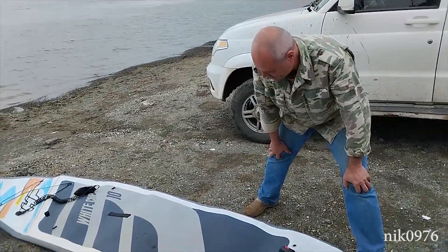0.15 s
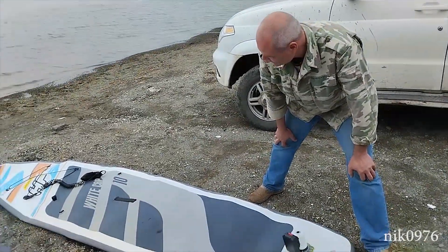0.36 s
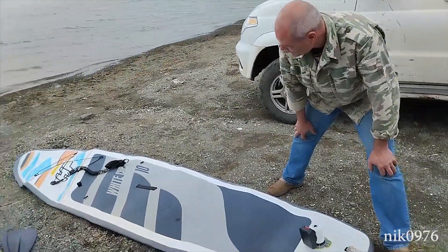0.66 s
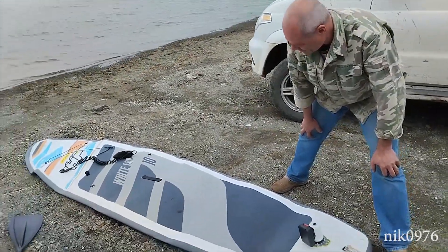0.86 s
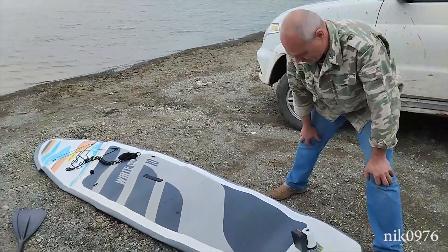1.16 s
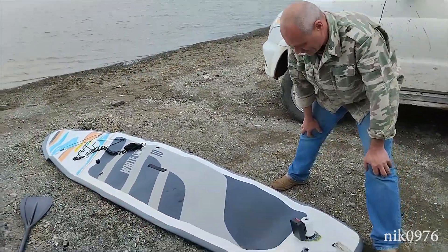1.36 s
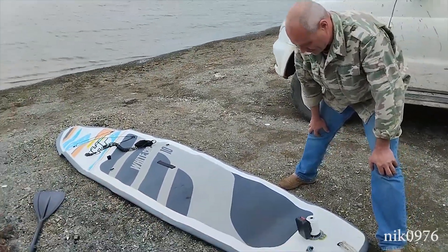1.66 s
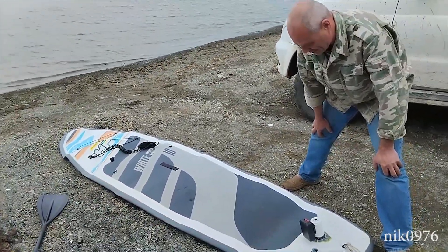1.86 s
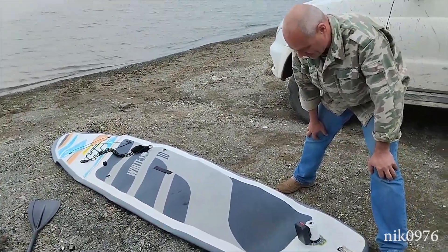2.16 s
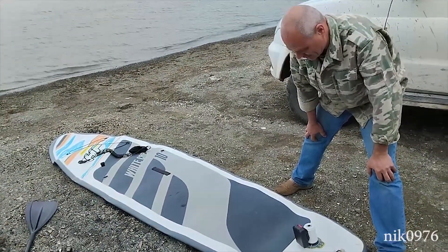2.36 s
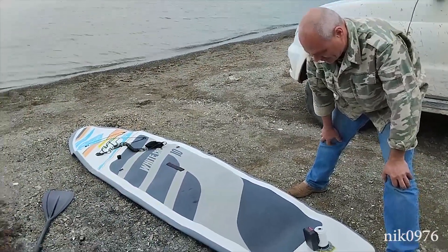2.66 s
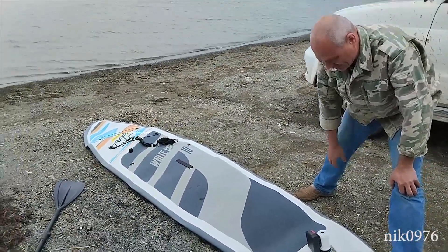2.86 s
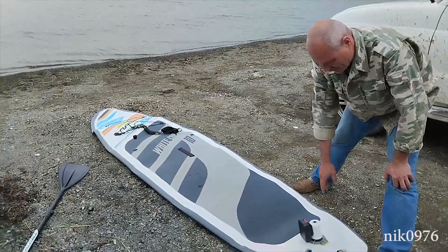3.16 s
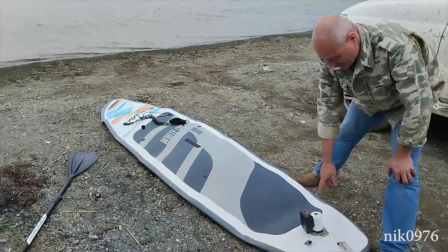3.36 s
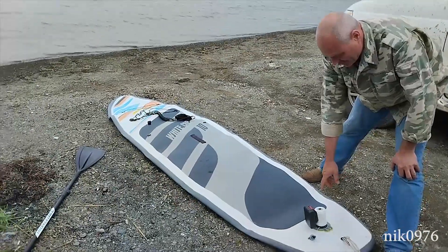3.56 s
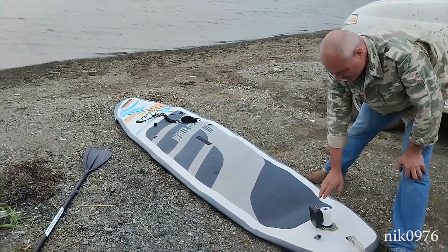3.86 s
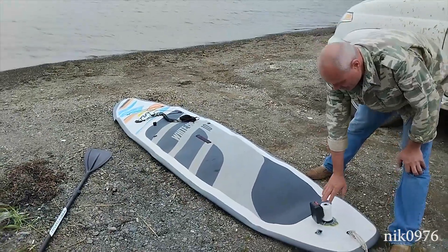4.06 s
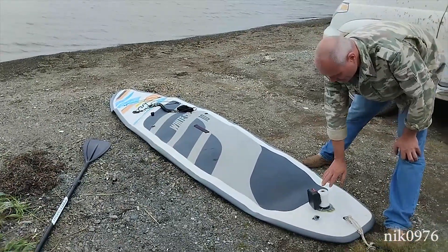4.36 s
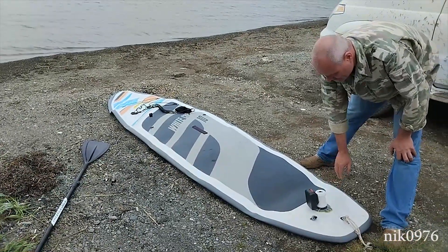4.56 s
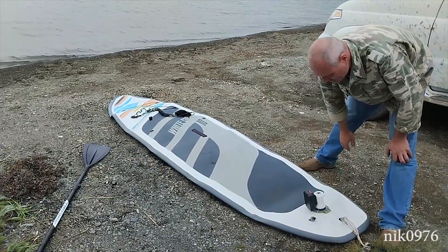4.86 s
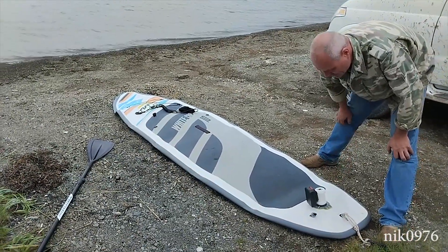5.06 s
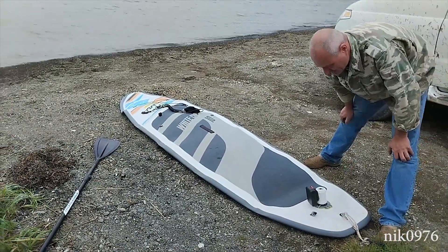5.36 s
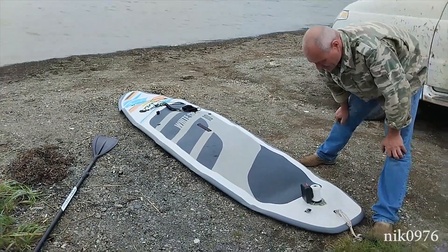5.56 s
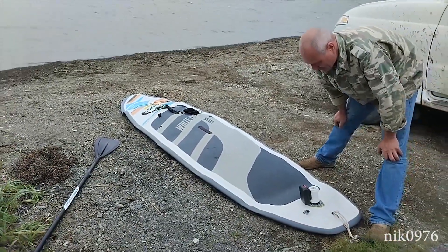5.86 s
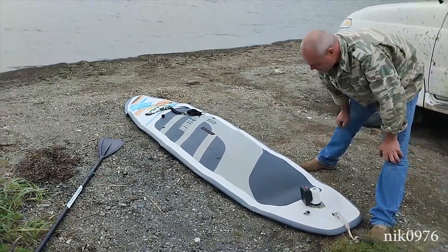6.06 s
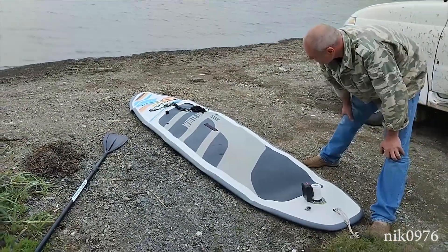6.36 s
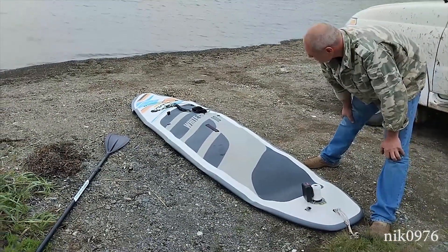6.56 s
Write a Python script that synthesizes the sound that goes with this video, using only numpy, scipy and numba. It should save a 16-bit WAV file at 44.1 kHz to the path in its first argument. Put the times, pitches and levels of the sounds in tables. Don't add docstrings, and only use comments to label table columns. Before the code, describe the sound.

A small electric inflator runs without pause on an inflating board, giving a thin piercing whine and bright rushing hiss. Irregular wind gusts thump the microphone, hardest around three seconds. A hand passing the blower throws a short puff of air at about four and a half seconds, with the whine briefly lifting. Faint water wash and a low hum lie behind, outdoors on gravel, from a few metres away.

```python
import sys
import numpy as np
from scipy import signal
from scipy.fft import rfft, irfft
from scipy.io import wavfile
from scipy.ndimage import uniform_filter1d, map_coordinates
from numba import njit

SR = 44100
rng = np.random.default_rng(int(sys.argv[2]) if len(sys.argv) > 2 else 0)


def wrap_up_sound(samples):
    columns = np.atleast_2d(samples).T
    tamed = np.clip(columns, -1, 1)
    steps = np.round(tamed * 32767).astype(np.int16)
    wavfile.write(sys.argv[1], SR, steps)


def boost(x):
    u = np.asarray(x, float) / 20
    return 10 ** u


N = 295911
T = np.arange(N) / SR
SLOW_T = T[::40]

# f/Hz, level/dB per Hz
SHORE_SPECTRUM = [(20, -0.5), (40, 1), (80, -15), (120, -40), (200, -13), (330, -16), (480, -13),
                  (610, -16), (900, -12.5), (1250, -15), (1600, -22), (2600, -28.5)]
# t/s, level/dB
HUM_LEVEL = [(0, -59), (.9, -64), (1.6, -62), (2.5, -54), (4.2, -52), (5.1, -55), (6.71, -60)]
# t/s, rumble/dB, time to fall 10 dB/s, buffet over rumble/dB
GUSTS = [(.05, -35, 0.12, 2.5), (.17, -31.5, 0.13, -4.5), (.52, -34.5, .04, -3.5), (.39, -24.5, .05, -8.5),
         (0.649, -25, 0.06, -12.5), (.83, -25, 0.08, -6.5), (.92, -23, 0.04, -20), (1.23, -33, -0.1, -19),
         (1.7, -26, 0.06, -10), (1.839, -18, 0.0754, -10.5), (2.11, -33, 0.06, 3.5), (2.26, -25, 0.02, -22),
         (2.36, -32.5, 0.12, 6), (2.44, -31.5, .09, -24), (2.75, -27.5, 0.18, -15.5), (2.975, -28, 0.06, 8),
         (3.01, -10.5, 0.0243, -10), (3.12, -25, .17, -12), (3.51, -32, 0.2, -13),
         (3.72, -27.5, 0.07, -11.5), (3.872, -24, .04, -11), (4.09, -27, .05, -22), (5.08, -29.5, 0.1, -14),
         (5.21, -24.5, 0.06, -5), (5.3, -25.5, 0.15, -9.5), (5.51, -25, 0.11, -4.5), (5.67, -30, 0.1, -1.5),
         (5.95, -23, 0.09, -18), (6.13, -28.5, 0.05, -10.5), (6.45, -32, 0.37, -22)]
# t/s, level/dB
CRACKS = [(.05, -41), (.88, -43.5), (1.85, -42.5), (2.33, -39), (2.39, -46), (2.96, -39), (3.008, -28),
          (5.49, -39)]
# rumble, buffet, crack level/dB
LULL_DB = [-52, -63.5, -54.5]
# f/Hz, level/dB per Hz
PUFF_SPECTRUM = ([(1300, -24.5), (3080, -7), (3820, -5), (4130, -24), (5110, -4), (6200, -12), (7590, -2)],
                  [(7810, -0.5), (9810, -1.5), (10510, -18), (11580, -11), (12240, -20), (13900, -10.5),
                  (15550, -24)])
# t/s, side/0-2 (front, flank, rear)
PHONE_SIDE = [(0, 0.095), (.9, 0.077), (1.7, 0.88), (3.5, 1.19), (4.6, 1.81), (6.71, 2.04)]
# f/Hz, level/dB per Hz
FRONT_SPECTRUM = ([(1300, -21.5), (1820, -18.5), (2220, -11.5), (2510, -16.5), (2890, -8), (3260, -15.5),
                   (3550, -20.5), (4430, -23), (5040, -9), (5420, -17.5), (5880, -6.5), (7590, -11)],
                   [(7810, -19), (9230, -8.5), (10050, -27), (10900, -18.5), (11440, -30.5), (11890, -23),
                   (13310, -37), (14310, -24), (15250, -12.5), (15550, -42)])
# f/Hz, level/dB per Hz
FLANK_SPECTRUM = ([(1300, -25.5), (2420, -20.5), (3110, -9), (3330, -17), (3650, -33), (4180, -29),
                   (4450, -22.5), (4720, -27), (5680, -14), (6560, -27.5), (7100, -16), (7590, -23)],
                   [(7810, -13), (8330, -16.5), (9100, -13), (9870, -16), (10540, -25), (12070, -26),
                   (13050, -35), (13630, -26.5), (14470, -35), (15550, -19)])
# f/Hz, level/dB per Hz
REAR_SPECTRUM = ([(1300, -28), (2090, -19.5), (2770, -21), (3090, -18), (3640, -14.5), (4200, -32),
                  (5610, -9), (5940, -9), (6520, -19), (6800, -11.5), (7010, -19.5), (7590, -7.5)],
                  [(7810, -13), (8050, -11.5), (8370, -1.5), (9210, -6), (10370, -16), (11210, -18),
                  (11810, -16.5), (12250, -23), (14480, -22), (15550, -20)])
# f/Hz, width/Hz, level/dB
CASING_MODES = [(1600, 67, -13), (6260, 60, -20), (7800, 210, -12.5), (9500, 300, -29), (15560, 150, 4)]
# lag/ms, wander/ms, strength/0-1
ECHO_PATHS = [(.62, .03, .07), (.9, .05, .11), (1.3, .08, .14), (1.7, .12, .13), (2.4, .2, .09)]
# side/0-2, throat/dB, casing/dB, nozzle/dB, top hiss/dB
AIR_BEAM = [(0, -40, -33, -27.5, -39), (.6, -38.5, -34.5, -28.5, -39.5), (1, -38.5, -34, -31.5, -38.5),
            (1.3, -37, -34.5, -31.5, -40), (1.85, -39.5, -34.5, -34.5, -39.5), (2, -41.5, -33, -36, -39)]
# t/s, aim/dB
AIM = [(0, 4.5), (.3, 2.5), (.6, 0), (1.2, 0.5), (1.9, -1.5), (2.3, 1), (3.1, 2.5), (3.5, 0), (4.1, -1),
       (4.7, -1), (5.3, -4.5), (5.9, 0.5), (6.2, -2.5), (6.45, 1.5), (6.71, -4)]
AIM_SHARES = [0.064, 0.072, 1, .1]
# t/s, f/Hz
BLADE_PITCH = [(0, 8462), (.42, 8525), (.86, 8451), (1.22, 8548), (1.51, 8507), (1.66, 8455), (2.32, 8424),
               (2.52, 8380), (2.76, 8436), (3.36, 8411), (3.83, 8492), (4.07, 8489), (4.3, 8443),
               (4.9, 8410), (5.07, 8463), (5.92, 8388), (6.31, 8492), (6.71, 8443)]
TONE_RATIOS = [4 / 7, 1, 2 / 7, 1 / 7]
# side/0-2, whistle/dB, half tone/dB, quarter tone/dB
TONE_BEAM = [(0, -34, -48, -61.5), (.65, -38.5, -44, -61), (1, -43.5, -44, -60.5), (1.11, -44, -46, -61),
             (1.17, -41.5, -54, -59), (1.7, -41.5, -53, -57.5), (1.86, -37.5, -53, -61.5),
             (1.93, -45, -52, -57), (2, -35.5, -53.5, -63)]
# t/s, change/dB, half length/s
BLADE_MEETINGS = [(0.065, 7, 0.15), (.38, 10, 0.54), (.66, 2, .07), (.78, 3, 0.033), (0.844, -13, 0.064),
                  (1.035, 6, 0.069), (1.257, -9, 0.087), (1.526, 7, 0.057), (1.59, -5, 0.046),
                  (2.18, 5.5, 0.083), (2.45, -13, 0.058), (2.56, -15, .09), (2.8, -9.5, .3),
                  (3.12, 6, 0.17), (3.45, -8, 0.074), (3.6, -7, 0.041), (3.853, 8, 0.13), (4.047, 6, .08),
                  (4.18, -3, 0.12), (4.45, 4, 0.19), (4.541, 15, 0.064), (4.704, 7, 0.15), (5.01, 6, 0.11),
                  (4.92, -9, 0.033), (5.322, 6.5, 0.09), (5.435, -23, 0.055), (5.7, 3, 0.22),
                  (5.95, -16, .1), (6.22, 4.5, 0.32), (6.62, -6.5, 0.16)]
# t/s, change/dB, half length/s
WHISTLE_FADES = [(1.97, -6, .1), (2.25, -5, 0.2), (2.8, -4, .2), (3.33, -7, .12), (4.26, -11, 0.067),
                 (5.45, -2, .12), (6.74, -6, 0.14)]
# t/s, level/dB, low f/Hz, high f/Hz
TREBLE_SPLITS = [(.337, -43, 11000, 14500), (.570, -40, 9600, 11800), (1.543, -32, 8900, 10300),
                 (4.635, -41, 9600, 11800), (4.726, -46, 12300, 14500), (5.542, -45, 10300, 11800),
                 (5.821, -46, 13700, 15200)]


def columns(rows):
    s, *values = np.transpose(rows)
    return [np.interp(T, s, v) for v in values]


def unit(x):
    return x / np.sqrt(np.mean(x ** 2))


def colour(white, points):
    hz, db = np.transpose(points)
    log_hz = np.log(np.fft.rfftfreq(N, 1 / SR) + 1)
    return irfft(rfft(white) * boost(np.interp(log_hz, np.log(hz), db)), N)


def noise(points):
    return unit(colour(rng.standard_normal(N), points))


def band(x, lo_hz, hi_hz, order=2):
    return signal.sosfiltfilt(signal.butter(order, [lo_hz, hi_hz], "band", fs=SR, output="sos"), x)


def walk(rate_hz):
    hold = int(SR / rate_hz)
    steps = np.repeat(rng.standard_normal(N // 500), hold)[:N + hold]
    return unit(uniform_filter1d(uniform_filter1d(steps, hold), hold)[:N])


@njit
def resonate(x, hz, width_hz):
    y, b, l = np.empty(len(x)), 0., 0.
    for i in range(len(x)):
        g, k = np.tan(np.pi * hz[i] / SR), width_hz / hz[i]
        v = (b + g * (x[i] - l)) / (1 + g * (g + k))
        b, l, y[i] = 2 * v - b, l + 2 * g * v, k * v
    return y


def steady(x, seconds):
    return x / np.sqrt(uniform_filter1d(x ** 2, int(seconds * SR)) + 1e-12)


def beam(rows):
    sides, *levels = np.transpose(rows)
    (side,) = columns(PHONE_SIDE)
    return [np.interp(side, sides, v) for v in levels]


def swell(events, lull_db):
    power = boost(lull_db) ** 2
    for s, db, fall_s in events:
        power = power + boost(db - 10 * abs(SLOW_T - s) / max(fall_s, 1 / 200)) ** 2
    return np.interp(T, SLOW_T, np.sqrt(power))


def meet(events):
    change_db = sum(db * np.clip(1 - abs(SLOW_T - s) / half_s, 0, 1) for s, db, half_s in events)
    return np.interp(T, SLOW_T, change_db)


def shore():
    hum_hz = 97 + 1.2 * walk(5)
    hum = np.sqrt(2) * np.sin(2 * np.pi * np.cumsum(hum_hz) / SR)
    wash = noise(SHORE_SPECTRUM) * boost(-47.5 + 0.85 * walk(4.85))
    return wash + boost(columns(HUM_LEVEL)[0]) * hum


def wind():
    eddies_per_s, buffet_shorter, crack_fall_s = 45, 0.55, 0.024
    rumble_gain = swell([(s, db, fall) for s, db, fall, _ in GUSTS], LULL_DB[0])
    buffet_events = [(s, db + over, fall * buffet_shorter) for s, db, fall, over in GUSTS]
    buffet_gain = swell(buffet_events, LULL_DB[1])
    crack_gain = swell([(s, db, crack_fall_s) for s, db in CRACKS], LULL_DB[2])

    eddies = (rng.random(N) < eddies_per_s / SR) * rng.exponential(size=N) ** 0.92
    push = unit(eddies - eddies.mean()) + 0.84 * rng.standard_normal(N)
    rough = push + 1.4 * rng.standard_normal(N)
    rumble = colour(push, [(12, -36), (30, 1.5), (60, -3.0), (95, -7), (125, -17.5), (300, -63)])
    buffet = colour(push, [(50, -18), (110, 0.5), (200, -2.5), (300, -22), (500, -42), (1000, -73)])
    crack = colour(rough, [(150, -27), (300, -1.0), (500, -5), (900, -25), (1400, -50)])
    rumble = steady(rumble, 0.085) * rumble_gain * boost(-3.5)
    buffet = steady(buffet, 0.14) * buffet_gain * boost(-0.35)
    return rumble + buffet + steady(crack, 0.24) * crack_gain * boost(-2.0)


def puff():
    peak_s, attack_s, hold_s, release_s, sag = 4.505, 0.09, 0.068, 0.047, 0.76
    corners_s = peak_s + np.cumsum([-attack_s, attack_s, hold_s, release_s])
    shape = np.interp(T, corners_s, [0, 1, sag, 0])
    low_skirt = [(150, -35), (350, -17), (650, -28)]
    burst = noise(np.vstack([low_skirt, *PUFF_SPECTRUM]))
    echo_ms = 1.25
    burst = burst + .3 * np.roll(burst, int(echo_ms * SR / 1000))
    return unit(burst) * shape * boost(-20.5 + 1.03 * walk(50))


def echoes(x):
    lags = [(lag_ms + wander_ms * walk(.9)) * SR / 1000 for lag_ms, wander_ms, _ in ECHO_PATHS]
    gains = [strength * (1 + .6 * walk(1.3)) for _, _, strength in ECHO_PATHS]
    out = x
    for lag, gain in zip(lags, gains):
        out = out + gain * map_coordinates(x, [np.arange(N) - lag], order=3)
    return out


def casing(hiss):
    return sum(boost(db) * resonate(hiss, hz * (1 + 0.0056 * walk(0.49)), float(width_hz))
               for hz, width_hz, db in CASING_MODES)


def air():
    (side,), (aim_db,) = columns(PHONE_SIDE), columns(AIM)
    white = rng.standard_normal(N)
    hiss = 0
    for k, spectrum in enumerate([FRONT_SPECTRUM, FLANK_SPECTRUM, REAR_SPECTRUM]):
        nearness = np.clip(1 - abs(side - k), 0, 1)
        hiss = hiss + nearness * unit(colour(white, np.vstack(spectrum)))
    hiss = echoes(hiss + casing(hiss))

    flow_db = 0.14 * walk(8)
    # low/Hz, high/Hz, trim/dB
    parts = [(1153, 4060, 1.69), (3750, 7850, 0.15), (8120, 10240, -1.5), (10910, 15220, 0.4)]
    out = 0
    for (lo_hz, hi_hz, trim_db), beam_db, share in zip(parts, beam(AIR_BEAM), AIM_SHARES):
        level_db = beam_db + share * aim_db + trim_db + flow_db + 0.43 * walk(24.47)
        out = out + steady(band(hiss, lo_hz, hi_hz), 0.56) * boost(level_db)
    return out


def shaft_turns():
    surge_s, surge_hz, rise_s, settle_s = 4.48, 85, .08, .16
    (hz,) = columns(BLADE_PITCH)
    since_s = np.clip(T - surge_s, 0, None)
    hz = hz + surge_hz * np.clip(since_s / rise_s, 0, 1) * np.exp(-since_s / settle_s)
    return np.cumsum(hz * (1 + .00035 * walk(60))) / SR


def rotor():
    (aim_db,) = columns(AIM)
    turns = shaft_turns()
    whistle_db, half_db, quarter_db = beam(TONE_BEAM)
    shake = walk(85)
    flutter_db = 1.7 * unit(shake - uniform_filter1d(shake, SR // 16))
    levels_db = [
        whistle_db + 0.52 * aim_db + meet(WHISTLE_FADES) + 0.97 * walk(30),
        -30 + meet(BLADE_MEETINGS) + flutter_db,
        half_db + 0.25 * walk(14),
        quarter_db + 0.42 * walk(21)]
    tones = sum(boost(db) * np.sin(2 * np.pi * k * turns) for k, db in zip(TONE_RATIOS, levels_db))
    bearing_db = -60 + 2.5 * walk(5)
    bearing_hz = 2560 + 8 * walk(6)
    bearing = boost(bearing_db) * np.sin(2 * np.pi * np.cumsum(bearing_hz) / SR)
    return np.sqrt(2) * (tones + bearing)


def scene():
    mono = rotor() + air() + puff() + wind() + shore()
    return np.array([mono, mono])


def band_limit(x):
    return signal.sosfilt(signal.butter(12, 16720, fs=SR, output="sos"), x)


def record(dry):
    side = 0
    for s, db, lo_hz, hi_hz in TREBLE_SPLITS:
        window = np.exp(-((T - s) / .012) ** 4)
        side = side + boost(db) * window * unit(band(dry[0], lo_hz, hi_hz, order=4))
    top_cut = signal.ellip(16, .3, 75, 15730, fs=SR, output="sos")
    mix = signal.sosfilt(top_cut, dry + np.array([side, -side]))
    return band_limit(mix)


dry = scene()
out = record(dry)
wrap_up_sound(out)
```